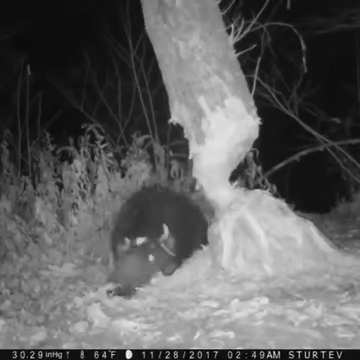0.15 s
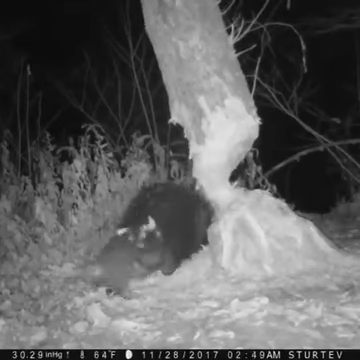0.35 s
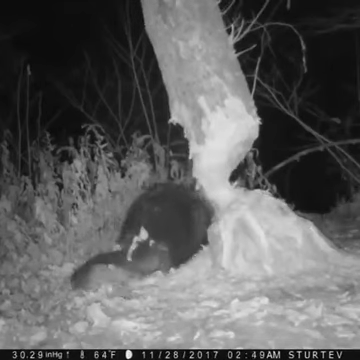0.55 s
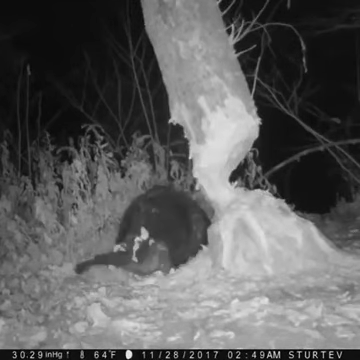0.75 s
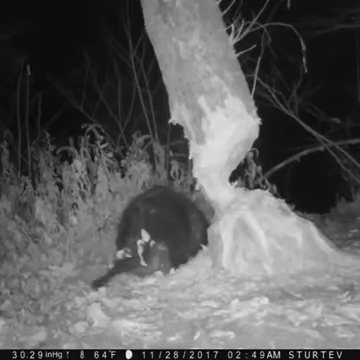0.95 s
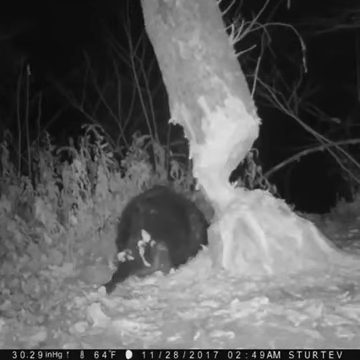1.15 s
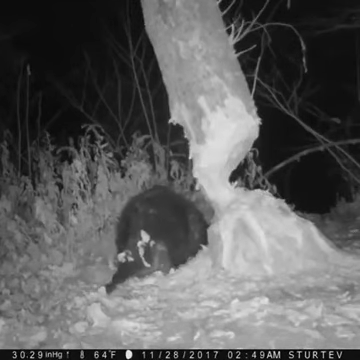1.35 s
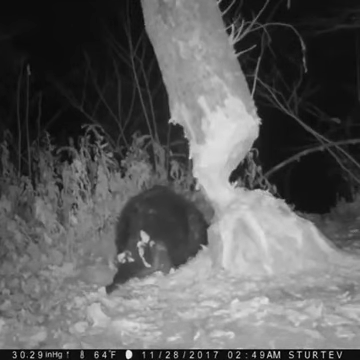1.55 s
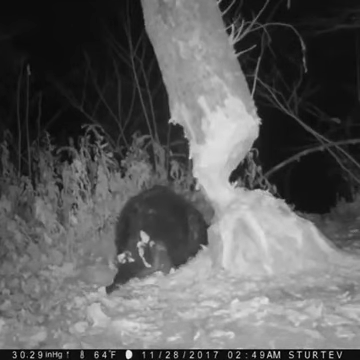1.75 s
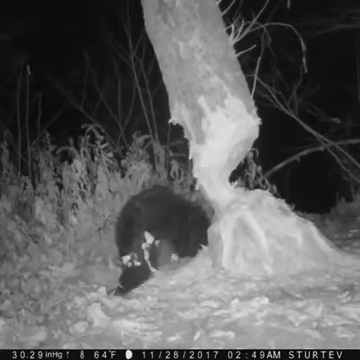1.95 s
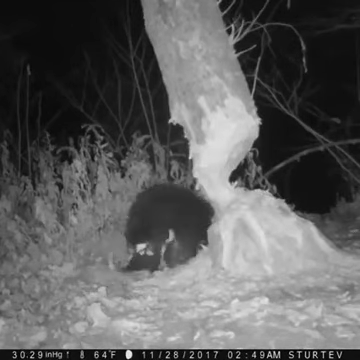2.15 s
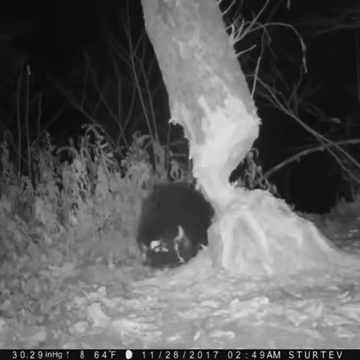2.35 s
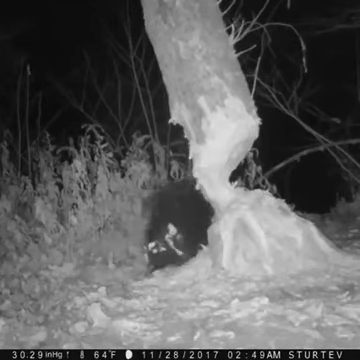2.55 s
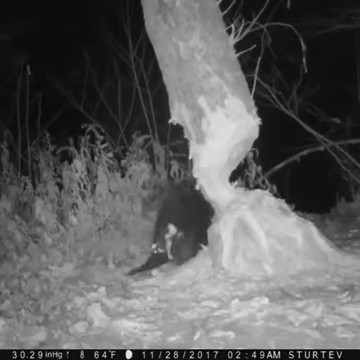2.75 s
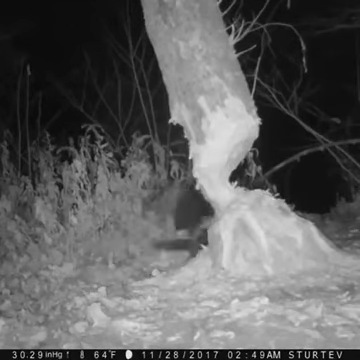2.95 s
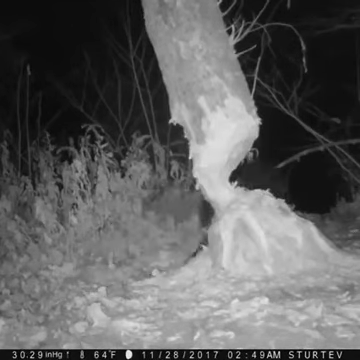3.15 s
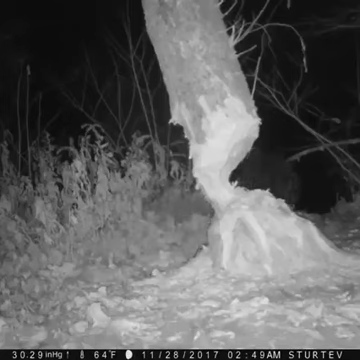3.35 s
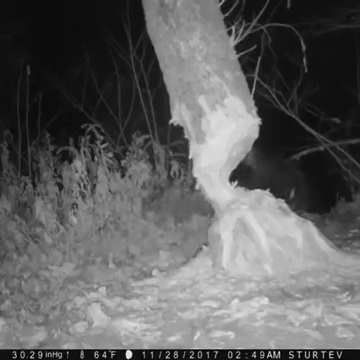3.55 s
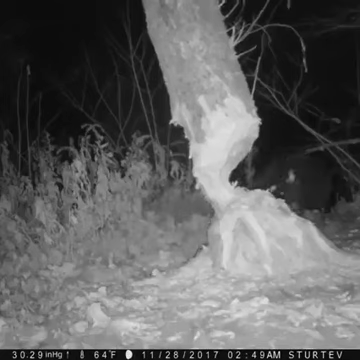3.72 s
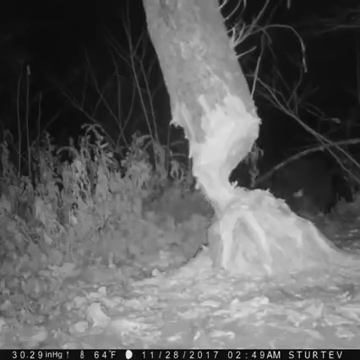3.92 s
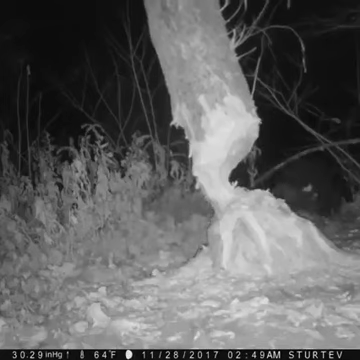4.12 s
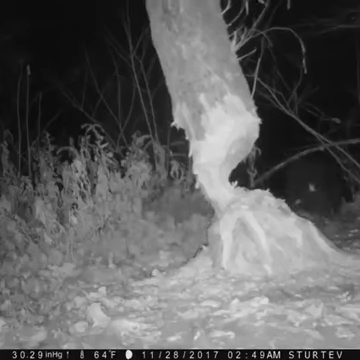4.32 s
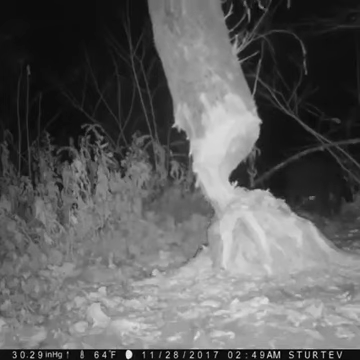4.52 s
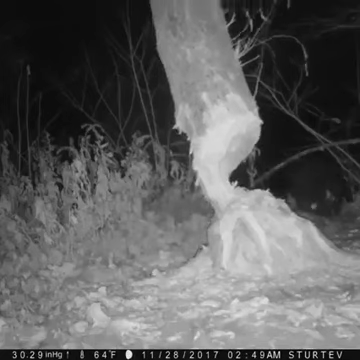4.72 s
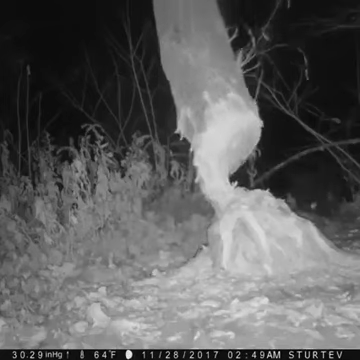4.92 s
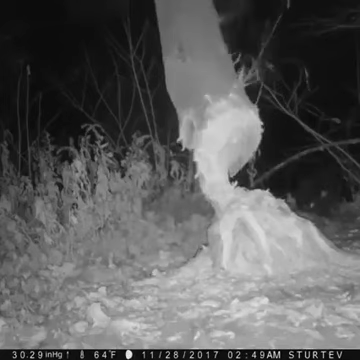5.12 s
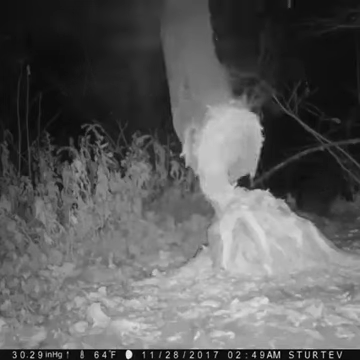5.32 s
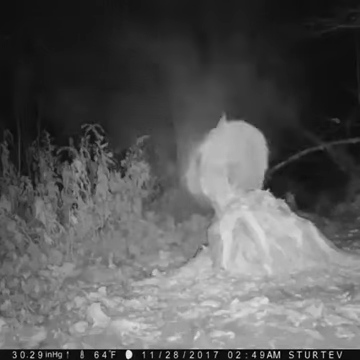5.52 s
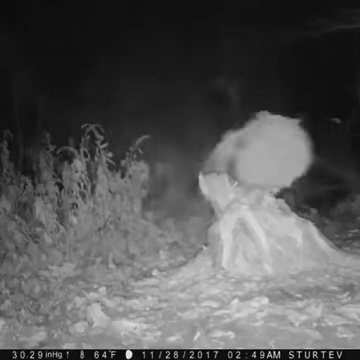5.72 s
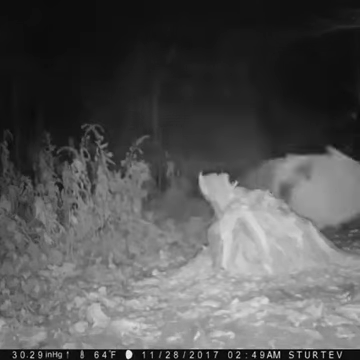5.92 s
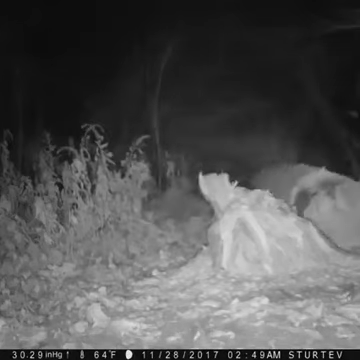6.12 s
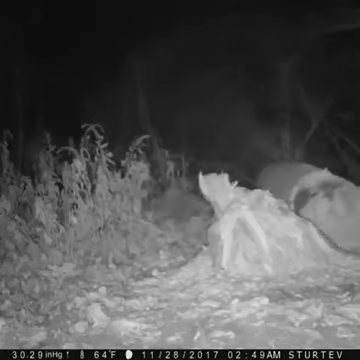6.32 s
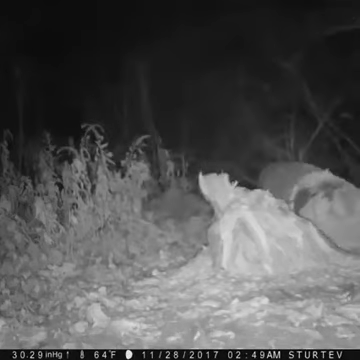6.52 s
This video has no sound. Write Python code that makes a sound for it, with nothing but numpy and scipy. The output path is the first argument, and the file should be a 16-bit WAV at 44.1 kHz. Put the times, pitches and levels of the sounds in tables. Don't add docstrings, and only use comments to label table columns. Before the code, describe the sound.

Quiet night hiss and dry weed rustles, then sharp wood cracks coming faster until a gnawed tree rips apart and crashes down through branches.

```python
import sys
import numpy as np
from scipy import signal
from scipy.fft import rfft, irfft, next_fast_len
from scipy.io import wavfile
from scipy.ndimage import uniform_filter1d, map_coordinates

SR = 44100
rng = np.random.default_rng(int(sys.argv[2]) if len(sys.argv) > 2 else 0)


def store_wav(level_fs):
    pcm = np.round(np.clip(np.atleast_2d(level_fs), -1, 1) * 32767)
    wavfile.write(sys.argv[1], SR, pcm.T.astype(np.int16))


def linear_from_db(decibels):
    return 10 ** (np.asarray(decibels, float) / 20)


N = 294442

# t/s, level/dB
TEARING = [
    (2.7, -57),
    (2.76, -44),
    (2.83, -36),
    (3.08, -34),
    (3.43, -34),
    (3.7, -33),
    (4.08, -32.5),
    (4.41, -30),
    (4.655, -27),
]
# t/s, level/dB, weight of moving wood/dB
FALL = [
    (5.4, -16, 3),
    (5.55, -13.5, 1),
    (5.6, -9, 8),
    (5.8, -11, 4),
    (5.85, -12, -0.5),
    (5.92, -14.5, 2.5),
    (6.09, -20, 5.5),
    (6.4, -25.5, 3.5),
    (6.677, -32.5, 3),
]
# t/s, splinter/dB, wood/dB, trunk thump/dB, t60/s
RIPS = [(4.67, -1.5, 1.5, 3, 0.45), (4.704, -5, -9, -5.5, 0.15), (4.731, -23, -11, -29, 0.076),
        (4.81, 1.5, 4, -4.5, 0.063), (4.982, -1, 1.5, -4, .25), (5.02, -15, 0, -20, 0.048),
        (5.122, -7.5, -14, -24, .084), (5.133, 1.5, -15, -37, .074), (5.242, -2, -1.5, -15, 0.12),
        (5.254, -6, -2, -30, 0.2), (5.495, -1.5, -9.5, -24, 0.54)]
# f/Hz, width/Hz, level/dB
TRUNK = [(180, 65, -11), (330, 260, -7), (492, 110, 1.5), (597, 61, -4.5), (840, 215, -9)]
# f/Hz, width/Hz, level/dB
LOOSE_TRUNK = [(222, 240, -12), (350, 58, 9), (517, 560, -3.5)]


def unit(x):
    return x / np.sqrt(np.mean(x ** 2) + 1e-20)


def filtered(x, response):
    size = next_fast_len(N + 8192)
    hz = np.fft.rfftfreq(size, 1 / SR)
    return irfft(rfft(x, size) * response(hz), size)[:N]


def coloured(x, points):
    f, db = np.transpose(points)

    def response(hz):
        return linear_from_db(np.interp(np.log(hz + 1), np.log(f), db, -120, -120))

    return unit(filtered(x, response))


def resonant(x, peaks):
    size = x.shape[-1]
    f = np.fft.rfftfreq(2 * size, 1 / SR)
    once = 0
    for k, (centre, width, db) in enumerate(peaks):
        mode = 1j * f * width / (centre * centre - f * f + 1j * f * width)
        once = once + (-1) ** k * linear_from_db(db / 2) * mode
    y = irfft(rfft(x, 2 * size) * once ** 2)[..., :size]
    return y / abs(y).max(-1, keepdims=True)


def wobble(rate):
    knots = rng.standard_normal(int(N * rate / SR) + 4)
    return map_coordinates(knots, [np.arange(N) * rate / SR])


def grains(rate, spread_db, life_s):
    sizes = linear_from_db(spread_db * rng.exponential(1, N).clip(0, 4))
    kicks = (rng.random(N) < rate / SR) * sizes
    return unit(signal.lfilter([1], [1, -np.exp(-1 / (life_s * SR))], kicks))


def surges(rows):
    t = np.arange(N) / SR
    rise_s, fall_s = 0.05, 0.09
    power = 0
    for s, hold, db in rows:
        before, after = (s - t).clip(0), (t - s - hold).clip(0)
        power = power + linear_from_db(db - 20 * before / rise_s - 20 * after / fall_s) ** 2
    return power


def strain(t):
    # t/s, level/dB, weight of moving wood/dB
    breaking = [
        (4.75, -28.5, 18),
        (4.8, -20, 13.5),
        (4.9, -21, 7.5),
        (5.04, -17.5, 7.5),
        (5.09, -21, 9),
        (5.17, -13.5, 6),
        (5.3, -12.5, 1.5),
        (5.36, -17, 4),
    ]
    standing = [(s, db, 0) for s, db in TEARING]
    s, level_db, weight_db = np.transpose(standing + breaking + FALL)
    still_db = -61
    return np.interp(t, s, level_db, still_db), np.interp(t, s, weight_db)


def voiced(s, splinter_db, wood_db, t60, thump_db=None):
    if thump_db is None:
        thump_db = wood_db - 28.5 + 12 * np.log2(t60 / 0.0089)
    split_db = (splinter_db + wood_db) / 2
    return s, splinter_db, split_db, wood_db, thump_db, t60


def cracks(events, trunk, gain_db, thump_db, late_s, tail_db, lumpy_db, size):
    # f/Hz, width/Hz, level/dB
    splinter = [(4710, 960, 3.5), (6970, 2570, 7.5)]
    # f/Hz, width/Hz, level/dB
    spark = [(10350, 5400, 15), (13700, 830, 19)]
    # f/Hz, width/Hz, level/dB
    split = [(3170, 1840, 0)]
    # f/Hz, width/Hz, level/dB
    knock = [(1535, 1185, 1), (1920, 1350, 0.5)]
    s, splinter_db, split_db, knock_db, low_db, t60 = np.transpose(events)[:, :, None]
    t = np.arange(size) / SR
    draws = rng.standard_normal((len(events), 6, size))
    kicks = np.sign(draws)
    lumps = linear_from_db(lumpy_db * unit(uniform_filter1d(draws[:, 5], size=130)))
    tail = linear_from_db(tail_db - 60 * t / (t60 + 0.16))
    onset = 1 - np.exp(-t / 0.000067)

    def burst(speed):
        return onset * lumps * (linear_from_db(-60 * speed * t / t60.clip(0.003)) + tail)

    swell = (t / late_s) ** 3 * (np.exp(-3 * t / late_s) + 0.0047 * np.exp(-t / late_s))
    rows = linear_from_db(splinter_db + gain_db) * resonant(burst(0.83) * kicks[:, 0], splinter)
    rows += linear_from_db(splinter_db + gain_db - 13.5) * resonant(burst(0.71) * kicks[:, 4], spark)
    rows += linear_from_db(split_db + gain_db) * resonant(burst(1.05) * kicks[:, 1], split)
    rows += linear_from_db(knock_db + gain_db) * resonant(burst(1.73) * kicks[:, 2], knock)
    rows += linear_from_db(low_db + thump_db) * resonant(swell * kicks[:, 3], trunk)
    at = np.round((s - 0.0005) * SR).astype(int) + np.arange(size)
    return np.bincount(at.ravel(), rows.ravel(), N + size)[:N]


def camera_noise():
    # f/Hz, level/dB per Hz
    night = [(15, 1), (30, -2), (140, -7.5), (325, -7.5), (360, -3), (395, -14.5), (500, -16.5),
             (1100, -19.5), (2700, -26.5), (7500, -34), (8600, -33.5), (15600, -41)]
    # f/Hz, level/dB rms
    whine_tones = [(7867, -43), (15369, -72)]
    t = np.arange(N) / SR
    noise = linear_from_db(-43 + 0.7 * wobble(4.6)) * coloured(rng.standard_normal(N), night)
    for hz, db in whine_tones:
        phase = 2 * np.pi * hz * t + 0.27 * wobble(6.7)
        noise = noise + linear_from_db(db + 3.5 + 0.78 * wobble(6.7)) * np.sin(phase)
    return noise


def foliage():
    # start t/s, hold/s, level/dB
    stirs = [(0.0, .2, -50), (.24, .16, -54), (.44, .02, -38), (.51, .05, -37.5), (.6, .04, -57),
             (1.92, 0.09, -51), (2.12, 0.11, -45), (2.24, 0.075, -56), (2.34, 0.015, -47),
             (2.42, 0.087, -40), (2.54, 0.1, -48), (2.65, 0.043, -43), (3.07, .03, -30), (3.29, .02, -29),
             (3.34, .03, -25), (3.46, 0.053, -28.5), (3.87, .05, -28)]
    # start t/s, hold/s, level/dB
    rumbles = [
        (3.45, 0.053, -39),
        (3.84, 0.02, -38),
        (4.51, 0.032, -36),
        (5.0, 0.043, -24),
        (5.12, .03, -28.5),
        (5.26, 0.065, -23.5),
        (5.59, 0.024, -24),
        (5.7, 0.11, -17),
        (5.95, 0.06, -29),
    ]
    # f/Hz, level/dB per Hz
    dry_leaves = [(2500, -40), (3500, -8.5), (4500, -5.5), (5600, -0.5), (7000, -1), (8100, -4),
                  (8500, -36)]
    # f/Hz, level/dB per Hz
    crackle_colour = [(2000, -13), (3000, -6.5), (4100, -4), (6800, 0), (8100, -3), (8500, -82)]
    # f/Hz, level/dB per Hz
    swish_colour = [(500, -4.5), (950, -6), (1500, 4), (2500, 0.5), (3300, -0.5), (4500, -11)]
    # f/Hz, level/dB per Hz
    air_colour = [(7900, -49), (8400, 0.5), (10500, 0), (11800, -5), (13000, -0.5), (14600, -1.5),
                  (15600, -6)]
    # f/Hz, level/dB per Hz
    groan_colour = [(60, -25), (120, -5.5), (300, -11), (400, -9), (455, 1.5), (520, -9), (900, -10.5),
                    (1400, -34)]
    # f/Hz, level/dB per Hz
    thud_colour = [(30, -7), (120, 0), (200, 3.5), (350, 2.5), (600, -4.5), (1000, -8), (1500, -47)]
    t = np.arange(N) / SR
    level_db, weight_db = strain(t)
    weeds = t < TEARING[0][0]
    level = np.sqrt(linear_from_db(level_db) ** 2 + surges(stirs))
    breaks = grains(500, spread_db=4.5, life_s=0.0029)
    flutter = 0.58 * wobble(30)

    def rough(share):
        return (1 + share * breaks) * rng.standard_normal(N)

    leaves = np.where(weeds, coloured(rough(0.52), dry_leaves), coloured(rough(0.25), crackle_colour))
    crackle = level * linear_from_db(flutter + 0.55 * wobble(40)) * leaves
    swish_db = -8.5 + 0.5 * weeds + weight_db + flutter + 0.25 * wobble(35)
    swish = level * linear_from_db(swish_db) * coloured(rough(0.24), swish_colour)
    air_db = -7.5 - 1 * weeds + flutter + 0.8 * wobble(26)
    air = level * linear_from_db(air_db) * coloured(rough(0.36), air_colour)
    murmur_db = -53.5
    moving = linear_from_db(level_db - 14.5 + 0.42 * weight_db) ** 2
    low = np.sqrt(moving + linear_from_db(murmur_db) ** 2 + surges(rumbles))
    groan = coloured(rng.standard_normal(N), groan_colour)
    heavy = coloured(rng.standard_normal(N), thud_colour)
    thud = low * linear_from_db(1.6 * wobble(15)) * np.where(t < RIPS[0][0], groan, heavy)
    return crackle + swish + air + thud


def stalk_ticks():
    # t/s, peak level/dB
    stalks = [(0.4544, -25), (0.52, -21), (.165, -30), (.63, -31), (.852, -37), (1.5908, -31),
              (2.0293, -34), (2.0413, -26), (2.1085, -28), (2.1161, -31), (2.1355, -26), (2.1635, -23),
              (2.3426, -30), (6.4974, -27)]
    # t/s, peak level/dB
    branches = [
        (5.455, -7),
        (5.474, -5.5),
        (5.524, 0.5),
        (5.57, -7),
        (5.875, -6),
    ]
    events = [(s, db, db - 14, -90, -90, 0.009) for s, db in stalks]
    events += [(s, db - 1, db - 16, db + 4, -90, 0.02) for s, db in branches]
    return cracks(events, TRUNK, gain_db=-4.5, thump_db=0, late_s=0.012, tail_db=-27, lumpy_db=-5.5, size=2048)


def jolts():
    # t/s, peak level/dB, f/Hz
    shakes = [(2.87, -21, 131), (2.895, -15, 288), (3.5, -28, 109), (3.585, -25, 424), (4.987, 0.5, 334),
              (4.678, -5.5, 130), (4.682, -8, 34.5), (4.682, 9, 330), (4.721, -15.5, 77), (4.988, -12, 107),
              (4.99, -14, 36.5), (5.652, -4, 141), (5.651, -4.5, 350), (5.67, -13, 37.4), (5.7, -4.5, 160),
              (5.717, -4, 310), (5.764, -2.5, 277), (5.774, -3.5, 161), (5.807, -3.5, 221),
              (5.953, -11, 105), (5.978, -17, 139), (6.05, -25, 29.8)]
    t = np.arange(N) / SR
    total = np.zeros(N)
    for s, db, hz in shakes:
        since = (t - s).clip(0)
        t60 = 0.13 / (hz / 100) ** 0.87
        swing = np.sin(2 * np.pi * hz * since)
        total += linear_from_db(db - 60 * since / t60) * (1 - np.exp(-since / 0.0035)) * swing
    return total


def puffs():
    # t/s, peak level/dB
    pushes = [
        (2.8661, -7),
        (3.4421, -24),
        (3.5847, -9.5),
        (3.8255, -16),
        (4.4967, -17),
        (4.669, -3),
    ]
    t = np.arange(N) / SR
    total = np.zeros(N)
    for s, db in pushes:
        u = (t - s).clip(0) / 0.00052
        total += linear_from_db(db) * (t > s) * (1 - u) * np.exp(-u)
    return total


def creak():
    # t/s, level/dB
    course = [
        (2.4, -69.5),
        (2.425, -42),
        (2.48, -40),
        (2.52, -50),
        (2.6, -52),
        (2.66, -54),
    ]
    db = np.interp(np.arange(N) / SR, *np.transpose(course), -120, -120)
    slips = grains(390, spread_db=2, life_s=0.0031) * rng.standard_normal(N)
    return linear_from_db(db - 2.5) * unit(resonant(slips, [(3120, 1200, 0)]))


def fibres():
    draws = rng.random((160, 4))
    per_s, over_db, spread_db = 45, 7, 2
    s = TEARING[2][0] + np.cumsum(-np.log(draws[:, 0])) / per_s
    db = strain(s)[0] + over_db - spread_db * np.log(draws[:, 1].clip(0.05))
    wood_db = db - 9 - 18 * draws[:, 2]
    t60 = 0.0022 + 0.0053 * draws[:, 3]
    events = np.transpose(voiced(s, db, wood_db, t60))[s < FALL[-1][0] - 0.05]
    return cracks(events, TRUNK, gain_db=-1, thump_db=3, late_s=0.012, tail_db=-30, lumpy_db=-1.5, size=1024)


def snaps():
    # t/s, splinter peak/dB, wood peak/dB, t60/s
    firm = [(2.7468, -17, -36.5, 0.04), (3.1731, -2, -31, 0.0094), (3.247, -9, -28, 0.0044),
            (3.282, -8, -24, 0.0064), (3.282, -10, -30, 0.0092), (3.2908, -8, -24, 0.018),
            (3.442, 0, -35, 0.0093), (3.4937, -3, -30, 0.0039), (3.5848, -1, -21.5, 0.015),
            (3.698, -7, -6, 0.0086), (3.8256, 0, -3.5, 0.015), (3.85, -0.5, -15, 0.0047),
            (3.9036, -1, -19, 0.0078), (3.9053, -4, -33, 0.012), (3.925, -11, -30, 0.0074),
            (3.9391, -7.5, -27, 0.025), (4.051, -3.5, -19.5, 0.014), (4.2006, -12, -29, 0.0073),
            (4.2322, -5, -20, 0.0094), (4.2364, 2, -8.5, 0.016), (4.2657, 5, -30, .008),
            (4.4007, -11.5, -20, 0.011), (4.475, -5, -32, 0.011), (4.4966, 2, -4, 0.019),
            (4.5636, -19, -15.5, 0.016), (4.615, -3, -21.5, 0.028), (4.6191, 1, -15, 0.0068),
            (4.648, -18, -19, .0091)]
    # t/s, splinter/dB, wood/dB, t60/s, trunk thump/dB
    heart_fibre = (2.8661, -3, 0, .028, -4)
    # t/s, peak
    # level/dB
    thin = [(0.4393, -26), (0.5427, -20), (.5755, -26), (1.3785, -36), (2.4273, -25), (2.502, -20),
            (2.5091, -19), (2.8171, -18), (2.8217, -23), (2.8277, -14), (2.8549, -30), (3.1472, -17),
            (3.3138, -14), (3.4294, -21), (3.5204, -16), (4.0332, -14), (4.5887, -14)]
    # t/s, splinter peak/dB, wood peak/dB, t60/s
    loose = [(4.7767, -12, 3.5, 0.016), (4.861, -3, 4, 0.019), (4.883, -14, -7, 0.014),
             (4.8975, -8, -9.5, 0.0083), (4.9143, -5, -21, 0.01), (4.9246, -10, -21, .01),
             (4.9423, -3, -7.5, 0.036), (4.952, 3, -16, 0.0072), (5.0585, -23, 1.5, 0.015),
             (5.2062, -6, 1.5, 0.0091), (5.2164, -9, 3.5, 0.024), (5.2853, -11, 1, 0.012),
             (5.3388, -1.5, -8.5, 0.021), (5.3512, -12, -5, 0.018), (5.376, -1, -31, 0.026)]
    standing = [voiced(*row) for row in firm + [heart_fibre]]
    standing += [voiced(s, db, db - 16.5, 0.0077) for s, db in thin]
    half_torn = [voiced(*row) for row in loose]
    manner = dict(gain_db=-2, late_s=0.0095, tail_db=-24.5, lumpy_db=-0.5, size=4096)
    return cracks(standing, TRUNK, thump_db=3.5, **manner) + cracks(half_torn, LOOSE_TRUNK, thump_db=-7, **manner)


def rips():
    torn = [voiced(s, splinter_db, wood_db, t60, low_db) for s, splinter_db, wood_db, low_db, t60 in RIPS]
    return cracks(torn, LOOSE_TRUNK, gain_db=0, thump_db=-2, late_s=0.017, tail_db=-24, lumpy_db=1.5, size=8192)


def scene():
    tree = snaps() + rips() + fibres() + creak() + puffs()
    surroundings = stalk_ticks() + foliage() + jolts() + camera_noise()
    return np.tile(tree + surroundings, (2, 1))


def noise_fill(x):
    # t/s, centre f/Hz
    flecks = [(.255, 5700), (.765, 10600), (.813, 5000), (.814, 14100), (1.093, 9000), (1.158, 6800),
              (1.161, 9000), (1.345, 6800), (1.345, 13700), (1.485, 6500), (1.882, 13100), (2.183, 4730),
              (2.184, 10400), (2.694, 6430), (2.695, 9700), (3.39, 4650), (3.392, 13400), (5.598, 7000),
              (5.641, 14400), (5.689, 5370), (5.698, 8100), (5.699, 10500), (5.759, 7500), (6.153, 13800),
              (6.384, 4700)]
    side, size, width_hz = np.zeros(N), 2048, 1500
    hz = np.fft.rfftfreq(size, 1 / SR)
    fade = signal.windows.kaiser_bessel_derived(size, 4 * np.pi)
    for s, centre_hz in flecks:
        at = round(s * SR) - size // 2
        band = abs(hz - centre_hz) < width_hz / 2
        held = irfft(rfft(x[at:at + size] * fade) * band).std()
        noise = unit(irfft(rfft(rng.standard_normal(size)) * band))
        side[at:at + size] += held * noise * fade
    return np.array([side, -side])


def band_limit(x):
    return signal.sosfilt(signal.butter(12, 15780, fs=SR, output="sos"), x)


def record(dry):
    clipped = dry / (1 + abs(dry / 1.2) ** 8) ** (1 / 8)
    clipped = clipped + noise_fill(clipped[0])
    limited = np.array([filtered(x, lambda hz: hz < 15790) for x in clipped])
    return band_limit(limited.clip(-1, 1))


dry = scene()
out = record(dry)
store_wav(out)
```